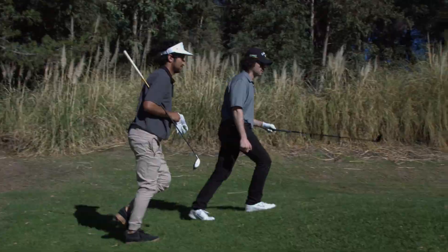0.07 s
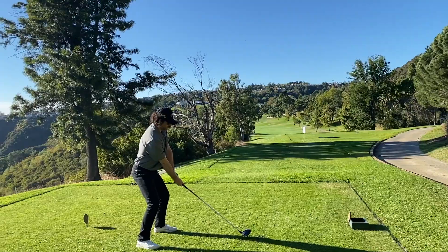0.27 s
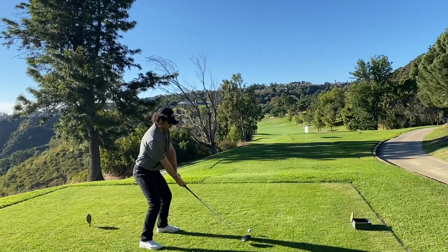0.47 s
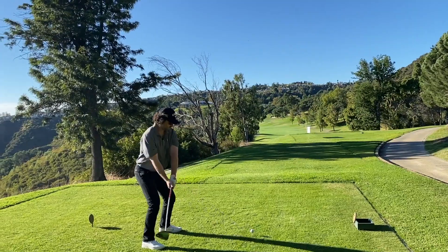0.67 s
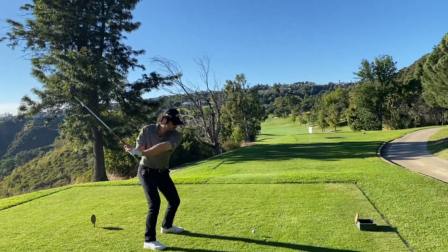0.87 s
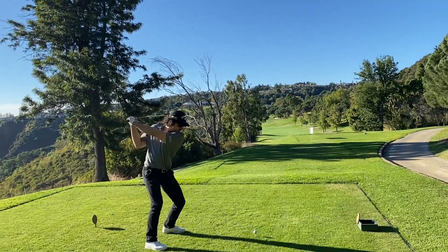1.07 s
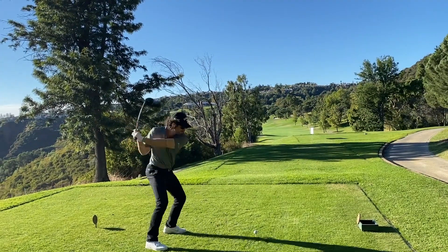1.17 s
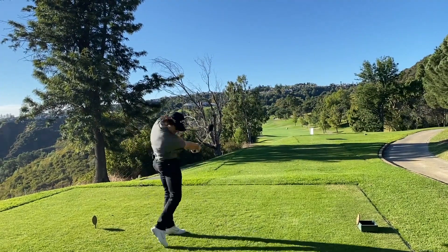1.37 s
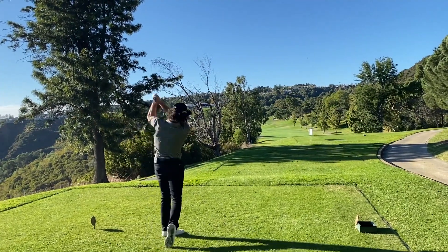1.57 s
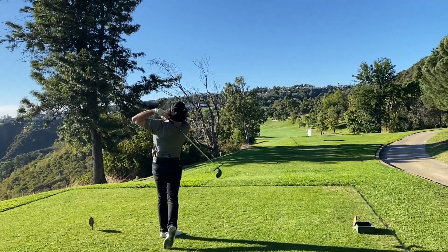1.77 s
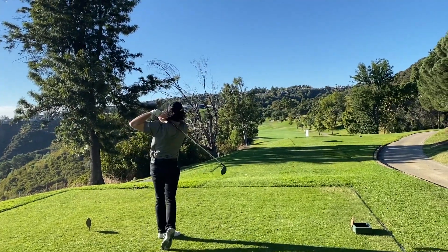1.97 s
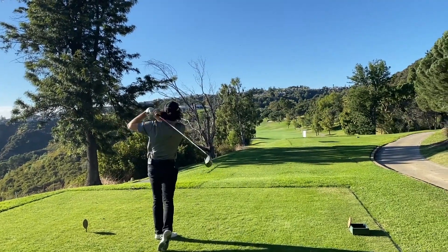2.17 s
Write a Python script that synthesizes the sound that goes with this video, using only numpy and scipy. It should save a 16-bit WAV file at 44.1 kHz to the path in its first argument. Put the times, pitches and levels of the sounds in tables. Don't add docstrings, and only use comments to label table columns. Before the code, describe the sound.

A golf driver cracks a ball off the tee, heard close through a shirt-clipped microphone outdoors.

```python
import sys
import numpy as np
from scipy import signal
from scipy.fft import rfft, irfft
from scipy.io import wavfile
from scipy.ndimage import uniform_filter1d

SR = 44100
rng = np.random.default_rng(int(sys.argv[2]) if len(sys.argv) > 2 else 0)


def wav_out(sig):
    wavfile.write(sys.argv[1], SR, np.round(np.clip(np.atleast_2d(sig).T, -1, 1) * 32767).astype(np.int16))


def attenuation_scalar(level_db):
    decades = np.asarray(level_db, float) / 20
    return 10 ** decades


N = 97284

CHANGE_S = 0.212
HIT_S = 1.3724


def evened(x):
    return x / np.sqrt(np.mean(x ** 2) + 1e-20)


def curve(points, order=1):
    rows = np.array(points)
    return np.interp(np.arange(N) / SR, rows[:, 0], rows[:, order])


def drift(shape, first, second, axes=(-1, -1)):
    once = uniform_filter1d(rng.standard_normal(shape), first, axes[0])
    return evened(uniform_filter1d(once, second, axes[1]))


def noise(points, patchy_db=0, grain=None):
    x = rng.standard_normal(N) if grain is None else grain
    _, _, z = signal.stft(x, SR, nperseg=256)
    patches = drift(z.shape, 6, 10, axes=(0, 1))
    x = signal.istft(z * attenuation_scalar(patchy_db * patches), SR, nperseg=256)[1][:N]
    f, db = np.transpose(points)
    hz = np.fft.rfftfreq(N, 1 / SR)
    colour = attenuation_scalar(np.interp(np.log(hz + 1), np.log(f + 1), db))
    return evened(irfft(rfft(x) * colour, N))


def resonate(x, hz, width):
    turn = np.exp(2j * np.pi * np.cumsum(hz * np.ones(len(x))) / SR)
    r = np.exp(-np.pi * width / SR)
    return 2 * (turn * signal.lfilter([1 - r], [1, -r], x / turn)).real


def resonate_twice(x, hz, width, second_width):
    return resonate(resonate(x, hz, width), hz, second_width)


def since(s):
    return np.maximum(np.arange(N) / SR - s, 0)


def shape(t, rise, t60):
    return (1 - np.exp(-t / rise)) * attenuation_scalar(-60 * t / t60)


def hum(hz, width, db, share):
    waver = evened(resonate_twice(rng.standard_normal(N), hz, width, width))
    tone = np.sqrt(2) * np.sin(2 * np.pi * hz * np.arange(N) / SR)
    return attenuation_scalar(db) * (tone + share * waver)


# frequency in Hz, level in dB per Hz.
WASH = [(15, -50), (25, -17.5), (59, 9), (476, -2.5), (754, -5.5), (1740, -22.5), (2610, -42),
        (10400, -39.5), (16000, -51)]
# time in seconds, level in dB, roar centre in Hz.
ROAR = [
    (0, -57.5, 835),
    (.45, -59, 934),
    (.92, -59.5, 826),
    (1.12, -47.5, 964),
    (1.41, -67, 796),
    (1.62, -51, 700),
    (1.76, -48, 681),
    (1.85, -46.5, 750),
    (2, -47.5, 700),
    (2.2, -50, 780),
]


def distance():
    earlier = np.arange(N) / SR < CHANGE_S
    hum_before = hum(hz=89.5, width=48, db=-48, share=-0.15)
    hum_after = hum(hz=72, width=31, db=-60, share=0.95)
    far = attenuation_scalar(-51.5) * noise(WASH, 1.5) + np.where(earlier, hum_before, hum_after)
    tyres = noise([(100, 13.5), (1100, -6.5), (1500, -4), (2600, -6)], 0.67)
    roar = resonate_twice(tyres, curve(ROAR, order=2), 480, 480)
    far += attenuation_scalar(curve(ROAR)) * evened(roar)
    hiss = attenuation_scalar(-79.5) * rng.standard_normal(N)
    reeds = attenuation_scalar(-69) * earlier * evened(resonate(rng.standard_normal(N), 2120, 880))
    return far + hiss + reeds


# frequency in Hz, level in dB per Hz.
CLOTH_COLOUR = [(59, -29.5), (100, -1.5), (308, -9), (991, -12.5), (1420, -14), (8460, -25), (9610, -23),
                (16000, -29)]
# time in seconds, level in dB, extra treble in dB.
RUBBING = [(0, -93, -9), (.15, -72.5, 10.5), (.22, -83, 5), (.36, -71, -6.5), (.45, -61.5, -4),
           (.54, -67, -2), (.64, -65, 0.5), (.76, -72, -5), (.84, -58.5, -2), (.95, -59.5, -3),
           (1.02, -53, -1), (1.08, -57, 1), (1.2, -45.5, -1.5), (1.24, -58.5, 1), (1.34, -42, -2.5),
           (1.74, -58.5, -2.5), (1.8, -66.5, -2), (2.2, -77.5, 6.5)]
# time in seconds, level in dB.
AIR_PUSH = [(0, -84), (.6, -65.5), (.95, -53), (1.2, -51.5), (1.32, -38.5), (1.39, -28.5), (1.43, -35.5),
            (1.49, -47.5), (1.62, -56), (2.2, -52)]
# start in seconds, length in seconds, level in dB, extra treble in dB.
DRAGS = [(0.089, 0.011, -78, 8), (0.915, 0.02, -58.5, 4), (0.974, .03, -59, -2), (1.031, 0.019, -56, -2),
         (1.115, 0.0094, -47.5, -6), (1.133, 0.031, -53.5, 1), (1.257, 0.017, -42.5, -6),
         (1.272, 0.02, -52, 1), (1.29, 0.014, -35, -5), (1.548, 0.014, -48.5, 10.5),
         (1.537, 0.0476, -46.5, 9), (1.579, 0.041, -51.5, -5), (1.644, 0.032, -57.5, 2),
         (1.854, 0.031, -59.5, -3), (1.88, 0.015, -68, 1), (2.04, .12, -74.5, -3)]


def cloth():
    t = np.arange(N) / SR
    catches = attenuation_scalar(2.7 * np.minimum(rng.exponential(1, N), 4)) * (rng.random(N) < 0.03)
    grain = rng.standard_normal(N) * (1 + catches)
    level = attenuation_scalar(curve(RUBBING)) * attenuation_scalar(1.5 * drift(N, 500, 300))
    treble = attenuation_scalar(curve(RUBBING, order=2))
    low, high = level / treble, level * treble
    for s, length, db, treble_db in DRAGS:
        onset = np.clip((t - s) / 0.005, 0, 1)
        release = np.clip((s + length - t) / 0.0034, 0, 1)
        drag = attenuation_scalar(db) * onset * release
        low = low + drag / treble
        high = high + drag * treble * attenuation_scalar(treble_db)
    air = noise([(15, -28.0), (40, -1), (70, -5), (120, -4.5), (300, -11.5), (800, -37.5), (3000, -70)])
    rub = noise(CLOTH_COLOUR, 2.0, grain)
    dull = signal.oaconvolve(rub, signal.firwin(15, 6500, fs=SR), "same")
    return low * dull + high * (rub - dull) + attenuation_scalar(curve(AIR_PUSH)) * air


# start in seconds,
# peak in dB, pitch in Hz, width in Hz.
TICKS = [(0.4947, -49.5, 3000, 1500), (0.5224, -43, 1080, 910), (0.5586, -51.5, 2500, 1500),
         (.5595, -52.5, 7300, 1500), (.681, -49.5, 2880, 1240), (.7608, -46, 9500, 2500),
         (.819, -49, 3200, 1500), (0.8432, -32.5, 3360, 804), (.8433, -44, 2210, 1500),
         (0.8434, -38.5, 9000, 5000), (0.8537, -43.5, 5000, 2000), (.918, -48, 7800, 1500),
         (.9835, -43, 2200, 1200), (1.0035, -48, 3000, 2500), (1.020, -44, 14500, 2500),
         (1.062, -52, 4200, 1500), (1.104, -45, 3000, 2000), (1.2047, -34.5, 2600, 1000),
         (1.2228, -41, 2480, 900), (1.222, -42, 5500, 2000), (1.2569, -38, 1290, 900),
         (1.2568, -23.5, 484, 900), (1.2572, -39, 5500, 1500), (1.2573, -32, 9000, 3000),
         (1.262, -35, 11000, 6000), (1.2678, -36, 2500, 2500), (1.268, -34, 12000, 6000),
         (1.279, -32, 11000, 6000), (1.2788, -30, 338, 200), (1.296, -45, 800, 500),
         (1.3025, -32, 13000, 5000), (1.3741, -7, 1192, 350), (1.5497, -26.5, 396, 197),
         (1.3769, -19, 1810, 500), (1.6445, -48, 14000, 3000), (1.6525, -38, 11000, 6000),
         (1.669, -49, 12000, 6000), (1.672, -46, 3000, 1500), (1.681, -41, 4670, 1300),
         (1.706, -50, 2300, 1000), (1.841, -54, 11580, 1490), (1.8603, -36.5, 3000, 2500),
         (1.8686, -34, 13830, 2500), (1.868, -38, 6000, 4000), (1.896, -54, 7500, 2000),
         (1.917, -55, 3200, 1500), (2.047, -62, 3000, 1200), (2.0604, -52.5, 2700, 1201)]


def ticks():
    out, t = np.zeros(N), np.arange(600) / SR
    for s, db, hz, width in TICKS:
        grit = 0.46 * rng.standard_normal(600) * np.exp(-t / 0.0002)
        tick = resonate_twice((t == 0) + grit, hz, width, 2 * width)
        at = round(s * SR)
        out[at:at + 600] += attenuation_scalar(db) * tick / abs(tick).max()
    return out


# start in seconds, peak in dB, final pitch in Hz, t60 in seconds, contact in seconds.
BODY_BUMPS = [
    (0.717, -37.5, 71, 0.052, 0.03),
    (0.94, -46.5, 47.4, 0.15, .03),
    (1.2741, -11, 67.7, 0.16, 0.018),
    (1.31, -27, 41.3, 0.15, 0.033),
    (1.3765, -15.5, 55.6, 0.13, 0.018),
    (1.401, -26.5, 76, .2, 0.02),
    (1.482, -35.5, 55, 0.12, 0.019),
    (1.548, -24, 86, 0.13, 0.013),
    (1.858, -33, 81.3, 0.071, 0.026),
]


def bumps():
    out = np.zeros(N)
    drop, drop_s = 2, 0.0036
    for s, db, hz, t60, contact in BODY_BUMPS:
        t = since(s)
        turns = hz * (t + drop * drop_s * (1 - np.exp(-t / drop_s)))
        lift = np.exp(-since(s + contact) / 0.0015)
        swing = -np.sin(2 * np.pi * turns)
        skewed = swing + 0.15 * swing ** 2
        out += attenuation_scalar(db + 5.5) * shape(t, 0.0025, t60) * lift * skewed
    return out


# time in seconds, level in dB, whistle in Hz.
SHAFT = [
    (1.3, -43.5, 450),
    (1.33, -46.5, 700),
    (1.345, -34, 880),
    (1.354, -29.5, 1050),
    (1.36, -26.5, 1130),
    (1.367, -28.5, 1130),
    (1.372, -36, 1000),
    (1.386, -32, 850),
    (1.43, -44, 484),
]


def swish():
    t, hz = np.arange(N) / SR, curve(SHAFT, order=2)
    tip, middle, spray = rng.standard_normal((3, N))
    whistle = evened(resonate_twice(tip, hz, 310, 230))
    whistle += 0.9 * evened(resonate_twice(middle, 0.7 * hz, 300, 300))
    whistle += 0.36 * evened(resonate(middle, 0.4 * hz, 360))
    top_speed = (hz / hz.max()) ** 4 * (np.arange(N) < HIT_S * SR)
    unsteady_hz = hz * (1 + 0.02 * evened(uniform_filter1d(middle, 150)))
    whistle += 2 * top_speed * np.sin(2 * np.pi * np.cumsum(unsteady_hz) / SR)
    whistle += 0.04 * evened(resonate(spray, 1.8 * hz, 4000))
    return whistle * attenuation_scalar(curve(SHAFT)) * (t > SHAFT[0][0]) * (t < SHAFT[-1][0])


# frequency in Hz, level in dB per Hz.
ECHO_COLOUR = [(180, -32), (300, -17.5), (546, -13.5), (961, -1), (1970, -11.5), (4910, -7), (7320, -3.5),
               (16000, -21.5)]


def echo():
    t, rise = since(HIT_S + 0.036), 0.014
    scatter = shape(t, rise, 0.19) * noise(ECHO_COLOUR, 2.5)
    ring = evened(resonate_twice(rng.standard_normal(N), 7340, 400, 400))
    return attenuation_scalar(-27.5) * (scatter + attenuation_scalar(-8.5) * shape(t, rise, 0.27) * ring)


def flutter():
    return 1 + 0.2 * drift(N, 250, 250)


RING_START_S = HIT_S + 0.0025
# time in seconds, level in dB, pitch in Hz.
TURF = [
    (1.375, -41.5, 3520),
    (1.382, -23.5, 3520),
    (1.39, -15, 3505),
    (1.4, -29.5, 3355),
    (1.408, -41.5, 3420),
    (1.42, -45.5, 3555),
    (1.44, -54.5, 3550),
    (1.456, -52, 3545),
    (1.475, -70, 3500),
]


def turf_ring():
    tone = np.sin(2 * np.pi * np.cumsum(curve(TURF, order=2)) / SR)
    sounding = (since(RING_START_S) > 0) * (since(TURF[-1][0]) == 0)
    return attenuation_scalar(curve(TURF)) * flutter() * tone * sounding


# frequency in Hz, level in dB, t60 in seconds, build-up in seconds.
HEAD_MODES = [(3000, -20, .03, 0.003), (4100, -25.5, 0.084, 0.0026), (3662, -1.5, 0.09, 0.014),
              (4320, -20, 0.05, 0.0082), (5640, -26, .04, 0.0023), (6570, -24, .05, .003),
              (6920, -17, 0.05, 0.0024), (7400, -18.5, .16, .01), (7950, -24, .035, .003),
              (8170, -15.5, .05, .003), (8800, -39.5, .04, .003), (9548, -33, 0.041, 0.0027),
              (10400, -21, .025, 0.0016), (11600, -32.5, .04, 0.0039)]


def head_ring():
    t, ring = since(RING_START_S), np.zeros(N)
    rise, glide_s = 0.045, 0.05
    heard = t + rise * (t - glide_s * (1 - np.exp(-t / glide_s)))
    for hz, db, t60, build_up in HEAD_MODES:
        tone = np.sin(2 * np.pi * (hz * heard + rng.random()))
        ring += attenuation_scalar(db) * flutter() * shape(t, build_up, t60) * tone
    return attenuation_scalar(1) * ring


# frequency in Hz, level in dB per Hz.
CRACK_COLOUR = [(200, -25.5), (500, -22), (1100, -11), (1640, -29), (3000, -17.5), (5000, -20), (7500, -12),
                (16000, -32.5)]


def crack():
    onset = shape(since(HIT_S + 0.002), 0.00099, 0.7)
    fade = attenuation_scalar(-60 * since(HIT_S + 0.01) / 0.071)
    return attenuation_scalar(-12.5) * onset * fade * noise(CRACK_COLOUR, 2.4)


FACE_S = 0.0032


def face_flex():
    t = since(HIT_S)
    flex = np.sin(2 * np.pi * 2433 * t) + attenuation_scalar(-12) * np.sin(2 * np.pi * 3030 * t)
    contact = np.clip(t / 0.0007, 0, 1) * np.clip((FACE_S - t) / 0.00017, 0, 1)
    return -attenuation_scalar(-3) * flex * contact


def ball_thud():
    t = since(HIT_S + FACE_S - 0.0004)
    return -attenuation_scalar(-0.5) * np.sin(2 * np.pi * 450 * t) * attenuation_scalar(-60 * t / 0.0056)


def strike():
    return face_flex() + ball_thud() + crack() + head_ring() + turf_ring() + echo()


def scene():
    t = np.arange(N) / SR
    dip = attenuation_scalar(-24 * np.exp(-((t - CHANGE_S) / 0.0045) ** 2))
    bed = dip * (distance() + cloth())
    return (bed + ticks() + bumps() + swish() + strike())[None]


def low_pass(x):
    return signal.sosfilt(signal.butter(12, 16640, fs=SR, output="sos"), x)


def record(dry):
    held = 0.58 * np.tanh(dry / 0.66)
    taps = [signal.firwin(601, hz, window=("kaiser", 7), fs=SR)[None] for hz in (15750, 16600)]
    edge, wide = (signal.oaconvolve(held, tap, "same") for tap in taps)
    mix = edge + attenuation_scalar(-31) * (wide - edge)
    return low_pass(mix)


dry = scene()
out = record(dry)
wav_out(out)
```